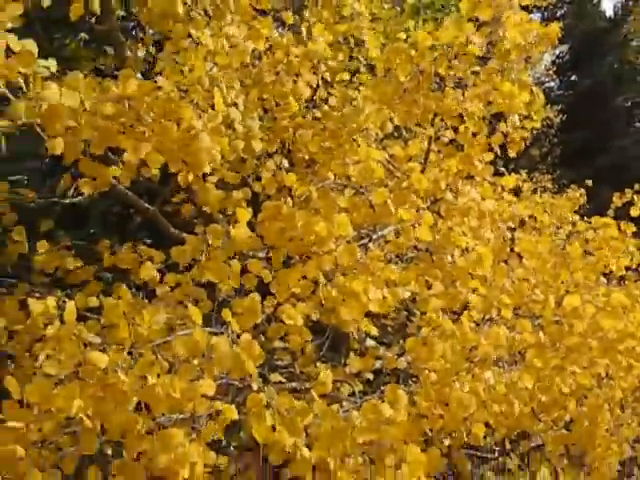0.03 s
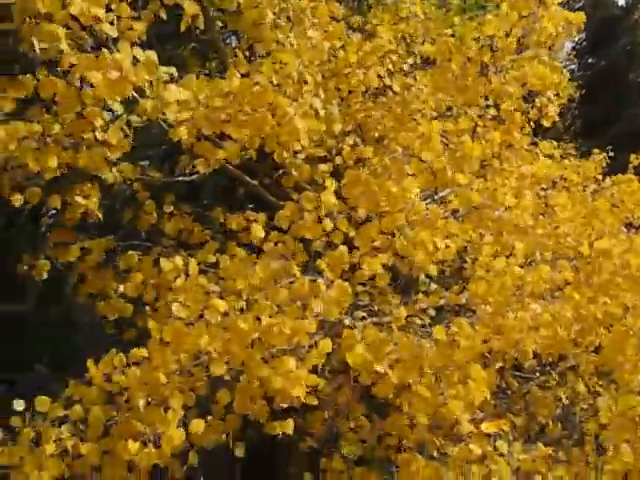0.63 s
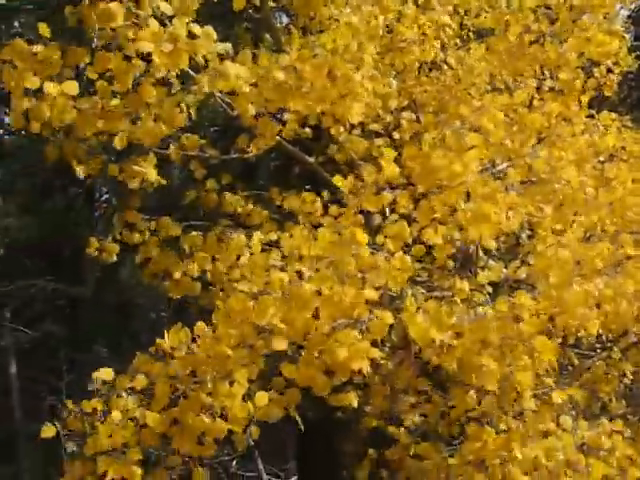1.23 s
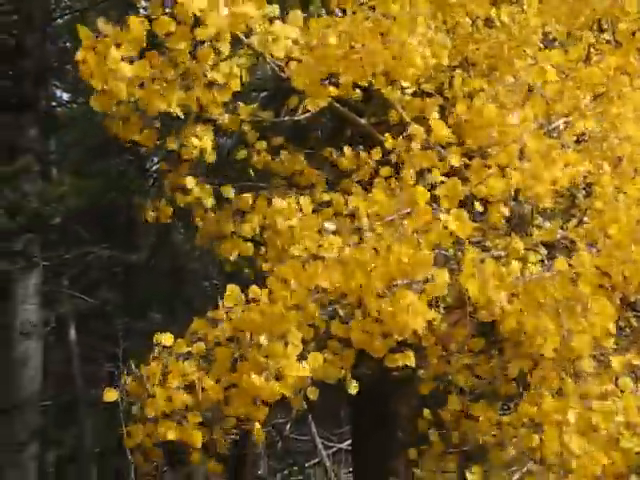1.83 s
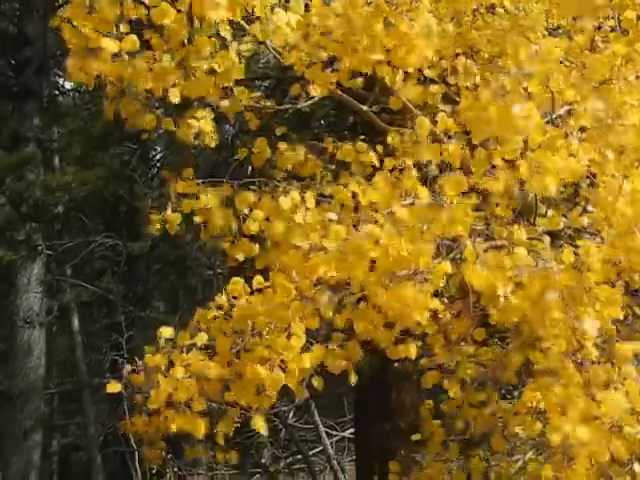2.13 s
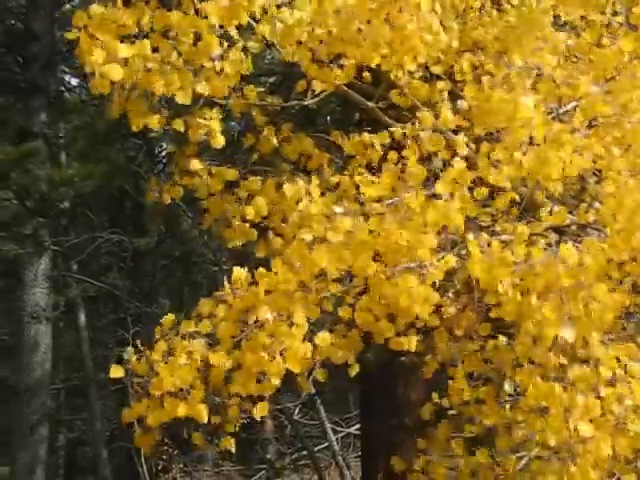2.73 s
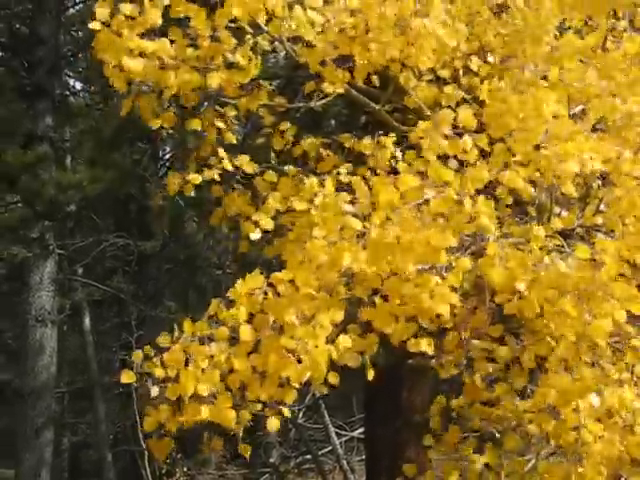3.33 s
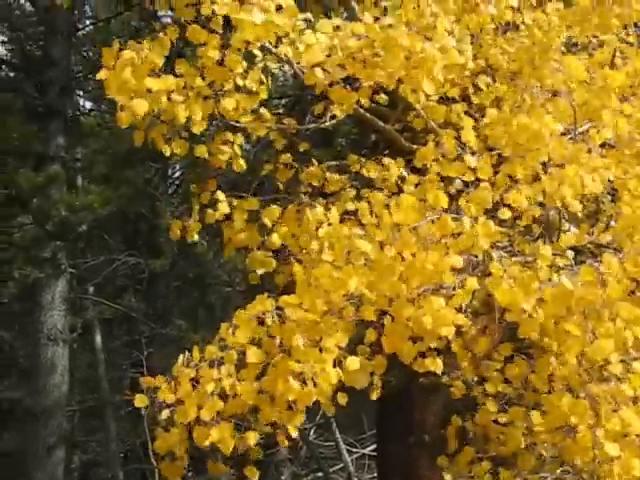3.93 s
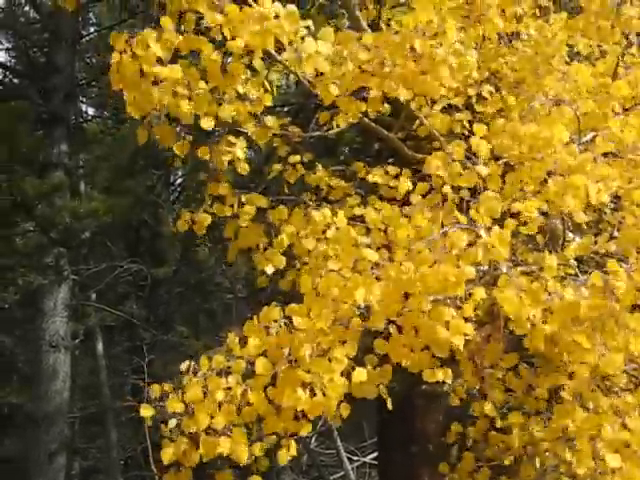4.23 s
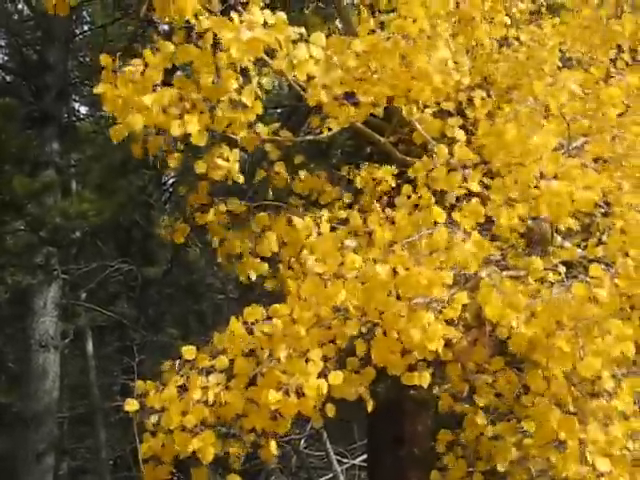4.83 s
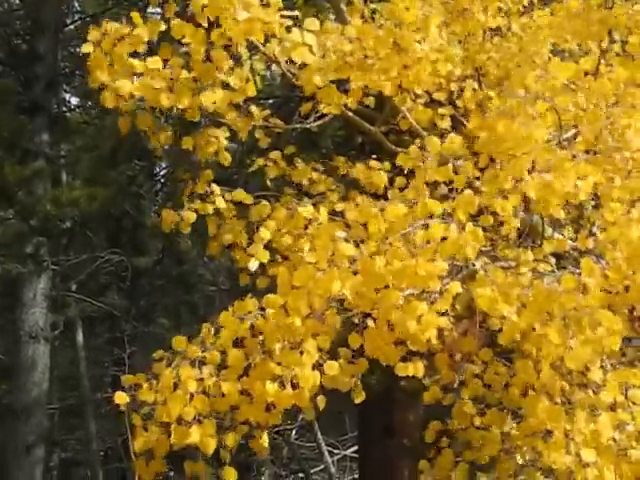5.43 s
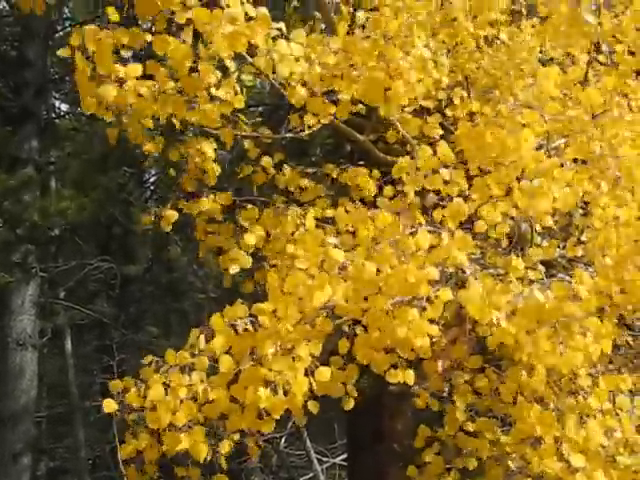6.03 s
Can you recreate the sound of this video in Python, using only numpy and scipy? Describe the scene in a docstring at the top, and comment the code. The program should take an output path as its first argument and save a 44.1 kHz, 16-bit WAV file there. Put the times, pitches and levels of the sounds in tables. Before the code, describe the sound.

Dry leaves flutter and rustle steadily while gusts of wind rumble and thump on the microphone, with one small knock.

```python
"""On a windy hillside, thousands of dry aspen leaves flutter and tap each other from the start, while
the conifer forest behind roars softly and gusts buffet the microphone. From 0.7 s a few near leaves
snap together, and from 1.2 s the gusts shed thumping eddies. Just before 2 s, as the rustle reaches
its height, something small and hard knocks once close by. Near 4 s the forest swells once;
the last gust dies away after 5.4 s, leaving the trees and two more snaps."""
import sys
import numpy as np
from scipy import signal
from scipy.fft import rfft, irfft, next_fast_len
from scipy.io import wavfile
from scipy.ndimage import uniform_filter1d, map_coordinates

SR = 44100
rng = np.random.default_rng(int(sys.argv[2]) if len(sys.argv) > 2 else 0)


def file_out(sig):
    """Save sig as 16-bit WAV at sys.argv[1]."""
    # one column per channel
    cols = np.atleast_2d(sig).T
    # limit, then scale
    lim = np.clip(cols, -1, 1)
    pcm = np.round(lim * 32767).astype(np.int16)
    wavfile.write(sys.argv[1], SR, pcm)


N = 273420  # 6.2 s


def amp(db):
    """Decibels to gain."""
    return 10 ** (np.asarray(db) / 20)


def unit(x):
    """Scale to rms 1."""
    return x / np.sqrt(np.mean(x ** 2) + 1e-20)


def automation(points):
    """A fader ride through (time, level) points, one value per sample."""
    return np.interp(np.arange(N) / SR, *np.transpose(points))


def wobble(rate_hz):
    """Smooth random modulation, rate_hz knots a second."""
    knots = rng.standard_normal(int(N * rate_hz / SR) + 4)
    return map_coordinates(knots, [np.arange(N) * rate_hz / SR])


def filtered(x, response):
    """Filter x by a gain given as a function of frequency."""
    size = next_fast_len(N + SR // 2)
    return irfft(rfft(x, size) * response(np.fft.rfftfreq(size, 1 / SR)), size)[:N]


def eq(x, points):
    """Shape x by (frequency, level) points on a log frequency axis."""
    f, db = np.transpose(points)
    return filtered(x, lambda hz: amp(np.interp(np.log(hz + 1), np.log(f), db)))


def rush(spectrum, patchy_db):
    """Turbulent noise of rms 1, with drifting patches of random gain."""
    cells = signal.stft(rng.standard_normal(N), nperseg=512)[2]
    patches = uniform_filter1d(rng.standard_normal(cells.shape), size=5, axis=0)  # across frequency
    patches = uniform_filter1d(patches, size=14, axis=1)  # across time
    noise = signal.istft(cells * amp(patchy_db * unit(patches)))[1][:N]
    return unit(eq(noise, spectrum))


def add(track, start_s, sound):
    """Mix a sound into the track at start_s."""
    part = track[max(round(start_s * SR), 0):][:len(sound)]
    part += sound[:len(part)]


def leaf_taps(density, count, spread_db, decay_cycles, pitch_hz):
    """Leaf contacts: tiny damped rings of random size and pitch, crowding where density is high."""
    start = np.searchsorted(np.cumsum(density) / np.sum(density), rng.random(count))
    hz = np.clip(pitch_hz * np.exp(.42 * rng.standard_normal((count, 1))), 900, 8000)
    size = amp(spread_db * np.minimum(rng.exponential(size=(count, 1)), 4))
    age = np.arange(SR // 300)
    cycles = hz * age / SR
    rings = size * np.sin(2 * np.pi * cycles) * np.exp(-cycles / decay_cycles)
    return unit(np.bincount((start[:, None] + age).ravel(), rings.ravel(), N)[:N])


# Fader ride of the fluttering crown, one slow swell: t/s, level/dB (before gain)
RUSTLE_RIDE = [(0, -50), (.35, -49.5), (1.5, -46.5), (1.9, -44.5), (2.75, -44.5), (4.1, -47), (5.75, -47.5),
               (6.2, -48.5)]
# Dry, papery leaf EQ: f/Hz, level/dB
LEAF_EQ = [(600, -25), (1200, -3), (2000, -9.5), (2650, -4), (3100, -4.5), (4200, 0.5), (5200, 0.5),
           (7000, 2)]

def aspen_rustle(gain_db=5, hiss_db=-2, patter_db=-4):
    """The far crown blurs into a hiss; nearer leaves patter in flurries, denser as the wind rises."""
    level_db = automation(RUSTLE_RIDE)
    flurry_db = 1.3 * wobble(rate_hz=35)
    density = amp(level_db / 2 + flurry_db)
    taps = leaf_taps(density, count=22000, spread_db=3, decay_cycles=1.2, pitch_hz=3500)
    patter = unit(eq(taps, LEAF_EQ))
    hiss = rush(LEAF_EQ, patchy_db=1.5)
    return amp(level_db + gain_db) * (amp(hiss_db) * hiss + amp(patter_db) * patter)


# Dark EQ of the forest's roar: f/Hz, level/dB
ROAR_EQ = [(20, -1.5), (80, -7.5), (200, -2), (400, 0), (600, -1.5), (800, -2), (1100, -9), (1600, -20.5),
           (3000, -43.5)]
# Breathy midrange EQ of the sough: f/Hz, level/dB
SOUGH_EQ = [(300, -17.5), (600, -11.5), (820, -1.5), (1080, -3), (1300, -9.5), (1700, -11.5), (2400, -14.5),
            (5000, -22.5)]
# Fader ride of the sough: t/s, level/dB
SOUGH_RIDE = [(0, -43), (2.2, -45.5), (3.3, -43), (3.92, -40), (4.25, -43.5), (4.8, -42.5), (5.55, -44),
              (6.2, -42)]

def forest(roar_db=-40, waver_db=-0.05):
    """Wind in the conifers: a bed of deep roar and a higher sough that swells as the wind passes."""
    roar = amp(roar_db + waver_db * wobble(rate_hz=7.7)) * rush(ROAR_EQ, patchy_db=-0.26)
    sough = amp(automation(SOUGH_RIDE)) * rush(SOUGH_EQ, patchy_db=0.4)
    return roar + sough


# Gust cues: crest t/s, level/dB (before gain), rise/s, fall/s; rise and fall each cover span_db
GUST_CUES = [(.13, -31.5, 0.17, 0.25), (.66, -35, 0.14, 0.1), (.93, -32, 0.085, 0.16),
             (1.3, -24, 0.26, .32), (2.07, -31.5, 0.1, 0.19), (2.26, -32.5, 0.081, 0.051),
             (2.5, -38, 0.25, 0.47), (2.8, -26, 0.058, .15), (3.07, -24.5, 0.18, 0.14),
             (3.39, -27.5, 0.08, .15), (3.65, -34.5, .08, 0.14), (4.39, -28, 0.2, 0.38),
             (4.86, -26, 0.1, .18), (5.11, -30.5, 0.058, 0.087), (5.39, -35.5, 0.25, 0.32)]

def gust_envelope(calm_db=-47.5, span_db=10.5, roundness=1.7):
    """Wind level in dB: gusts climb and die away over calm air. Roundness 1 is a spike, 2 a bell."""
    t = np.arange(N) / SR
    power = amp(calm_db) ** 2
    for crest_s, db, rise_s, fall_s in GUST_CUES:
        from_crest = np.maximum((crest_s - t) / rise_s, (t - crest_s) / fall_s)
        power = power + amp(db - span_db * from_crest ** roundness) ** 2
    return 10 * np.log10(power)


# Bass-heavy EQ of wind on the microphone: f/Hz, level/dB
RUMBLE_EQ = [(8, -12.5), (25, 0), (55, 3), (90, 0.5), (140, -5), (200, -15), (280, -16.5), (450, -32.5),
             (900, -44), (2000, -67)]
# Low-mid EQ of small eddies, here and in the wake of each thump: f/Hz, level/dB
SWIRL_EQ = [(60, -20.5), (130, 1), (220, -2.5), (330, -11.5), (600, -24.5), (1500, -50.5)]

def wind_buffet(gain_db=-1.5, swirl_db=-13, swirl_growth=1.1, lumpy_db=1.0):
    """Lumpy turbulence on the microphone; stronger wind sheds smaller eddies that reach higher."""
    level_db = gust_envelope()
    lumps_db = lumpy_db * wobble(rate_hz=28)
    rumble = amp(level_db + gain_db) * unit(eq(rng.standard_normal(N), RUMBLE_EQ))
    peak_db = level_db.max()
    swirl_gain = amp(peak_db + swirl_db + swirl_growth * (level_db - peak_db))
    swirl = swirl_gain * rush(SWIRL_EQ, patchy_db=3.5)
    return amp(lumps_db) * (rumble + swirl)


# Close-up leaf snaps: t/s, level/dB, f/Hz
SNAP_CUES = [(.6789, -31, 4800), (1.6786, -31, 4300), (1.9403, -24, 2600), (2.7352, -24, 4200),
             (2.922, -27.5, 4150), (3.175, -24, 5160), (4.634, -24, 4740), (4.9593, -26, 4130),
             (5.78, -27.5, 4930), (6.011, -27, 2600)]

def leaf_snaps(slap_t60_s=0.0024, scrape_db=-12, scrape_t60_s=0.056):
    """A stiff leaf slaps its neighbour, then scrapes along it."""
    out, t = np.zeros(N), np.arange(SR // 20) / SR
    for start_s, db, hz in SNAP_CUES:
        slap = np.sin(2 * np.pi * hz * t) * amp(-60 * t / slap_t60_s)
        # the scrape shakes the same blade, in a broad band round its pitch
        blade = signal.butter(1, [.7 * hz, 1.5 * hz], "bandpass", fs=SR)
        friction = unit(signal.lfilter(*blade, rng.standard_normal(len(t))))
        scrape = friction * amp(scrape_db - 60 * t / scrape_t60_s)
        add(out, start_s, amp(db) * (slap + scrape))
    return out


# Eddy hits: t/s, level/dB (before gain), half length of the suction/s, wake level/dB (re the thump)
THUMP_CUES = [(1.242, -14.5, 0.0027, -15.5), (1.351, -16.5, 0.0042, -7), (1.441, -8.5, 0.0029, -6),
              (2.801, -13, 0.0016, -10.5), (2.997, -21, 0.0022, -7.5), (3.095, -12.5, 0.0023, -20),
              (4.284, -20, 0.0023, -13), (4.678, -10, 0.002, -15), (4.819, -16.5, 0.0026, -15),
              (4.895, -16.5, 0.0019, -31), (5.11, -20, 0.0036, -16)]

def eddy_thumps(gain_db=-2, wake_delay_s=0.0082, wake_width_s=.015):
    """Each passing vortex is a brief suction between two pushes, trailed by a puff of swirling air."""
    out, t = np.zeros(N), np.arange(N) / SR
    swirl = rush(SWIRL_EQ, patchy_db=3)
    for centre_s, db, half_s, wake_db in THUMP_CUES:
        offset = (t - centre_s) / half_s
        thump = (offset ** 2 - 1) * np.exp(-offset ** 2 / 2)
        wake = amp(wake_db) * np.exp(-((t - centre_s - wake_delay_s) / wake_width_s) ** 2 / 2)
        out += amp(db + gain_db) * (thump + wake * swirl)
    return out


# The one-shot knock: t/s, level/dB
KNOCK_CUE = [(1.9553, -16)]
# Its resonances: f/Hz, level/dB (re the cue), t60/s
KNOCK_RING = [(1204, -1.5, 0.033), (1130, -10, 0.022), (1840, -17.5, 0.053), (2480, -7, 0.013),
              (3600, -12, 0.0097)]

def knock(attack_s=0.00028):
    """One small, hard contact with a short woody ring."""
    out, t = np.zeros(N), np.arange(SR // 10) / SR
    ring = sum(amp(db - 60 * t / t60) * np.sin(2 * np.pi * hz * t) for hz, db, t60 in KNOCK_RING)
    fade_in = 1 - np.exp(-t / attack_s)
    for start_s, db in KNOCK_CUE:
        add(out, start_s, amp(db) * ring * fade_in)
    return out


def scene():
    """Beds and spot sounds meet at one microphone in the open air."""
    beds = aspen_rustle() + forest() + wind_buffet()
    return (beds + leaf_snaps() + eddy_thumps() + knock())[None]


# Master EQ, a steep treble roll-off: f/Hz, level/dB
MASTER_EQ = [(4800, 0), (5300, -2), (5700, -5.6), (6000, -10.3), (6400, -18), (6700, -26.5), (7000, -38),
             (7300, -58)]

def record(dry, cutoff_hz=7250):
    """Roll off the top end of the mix, then cut everything above cutoff_hz."""
    return filtered(eq(dry[0], MASTER_EQ), lambda hz: hz < cutoff_hz)[None]


dry = scene()
out = record(dry)
file_out(out)
```